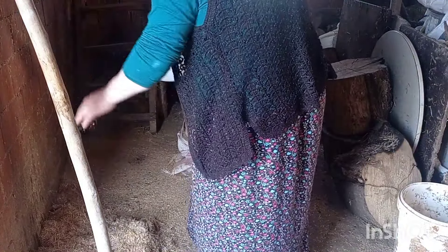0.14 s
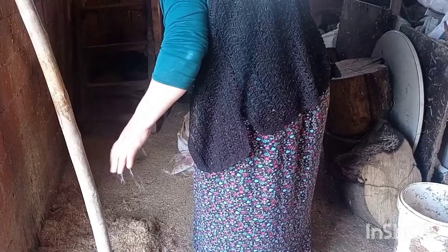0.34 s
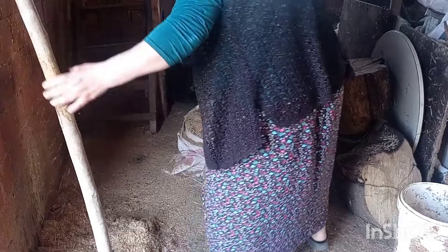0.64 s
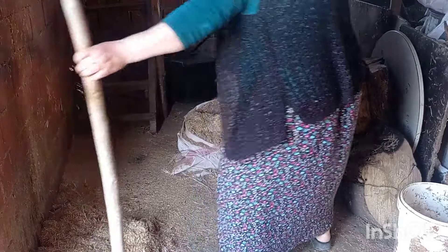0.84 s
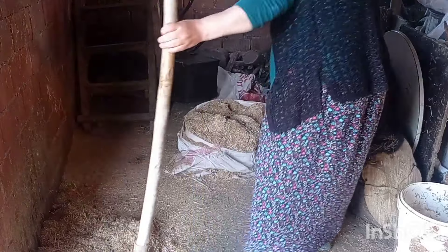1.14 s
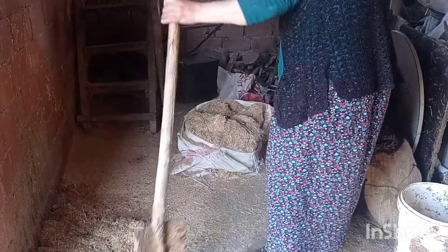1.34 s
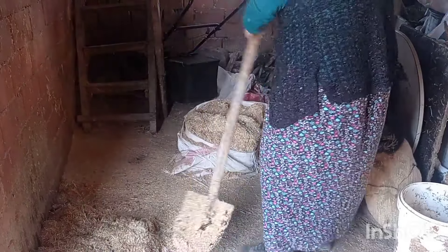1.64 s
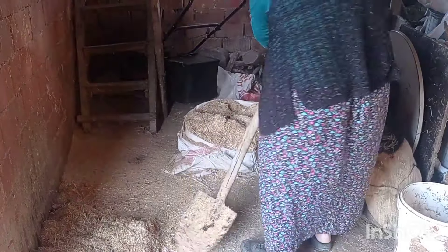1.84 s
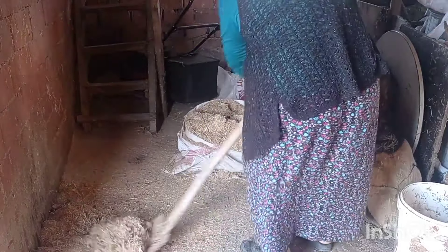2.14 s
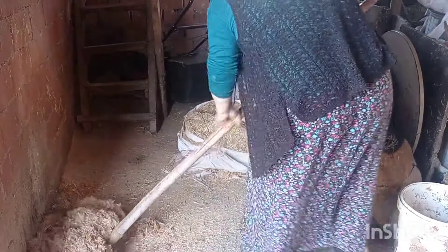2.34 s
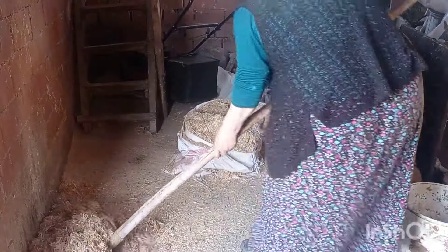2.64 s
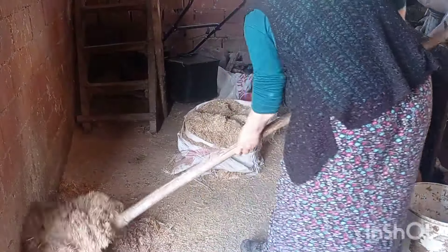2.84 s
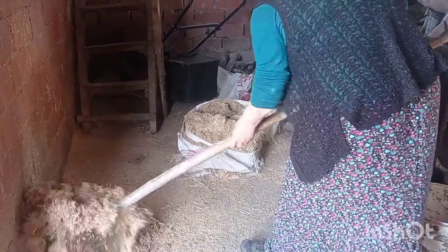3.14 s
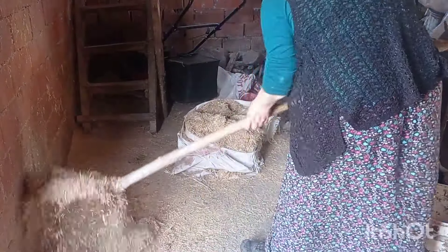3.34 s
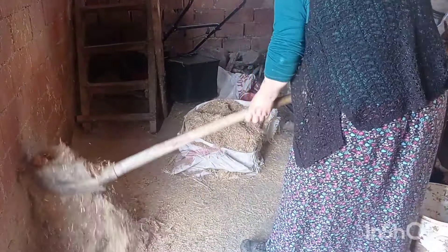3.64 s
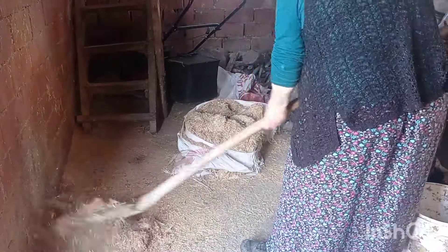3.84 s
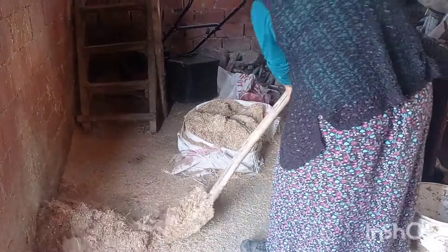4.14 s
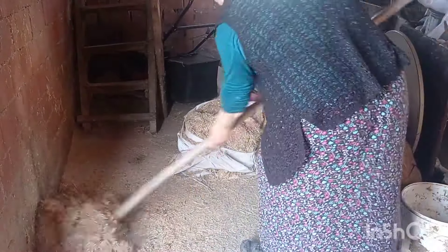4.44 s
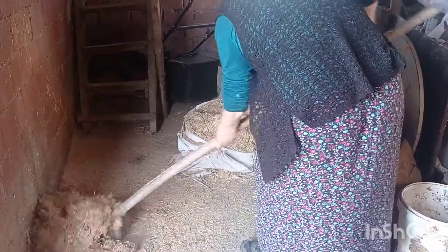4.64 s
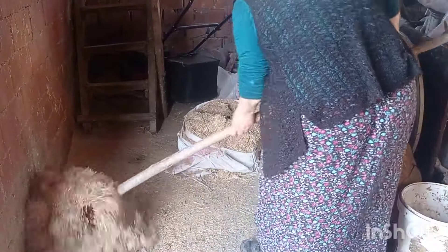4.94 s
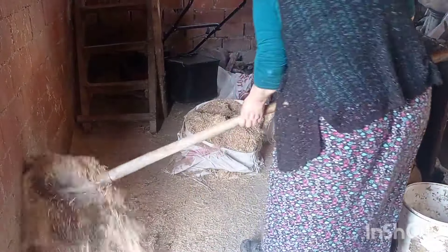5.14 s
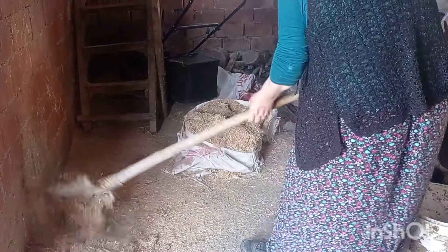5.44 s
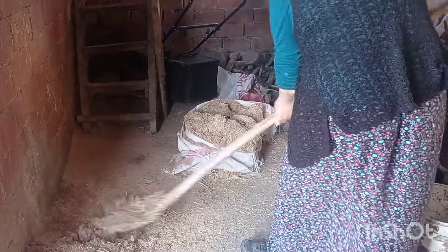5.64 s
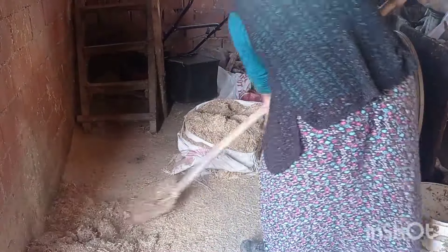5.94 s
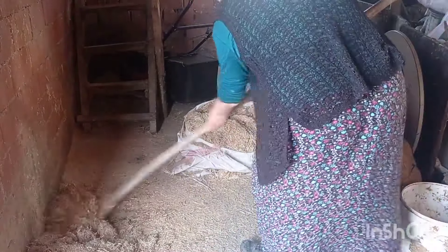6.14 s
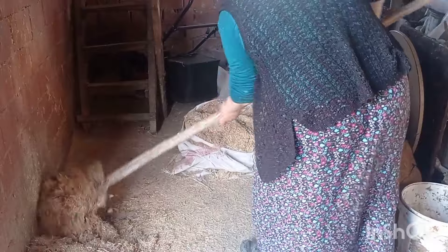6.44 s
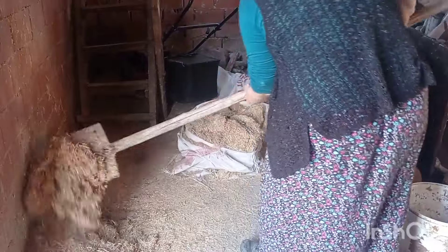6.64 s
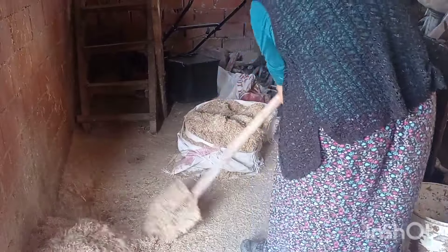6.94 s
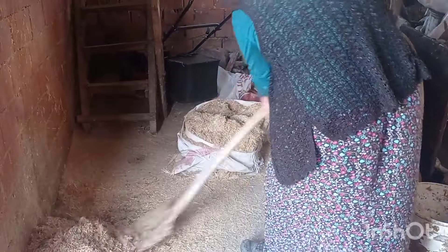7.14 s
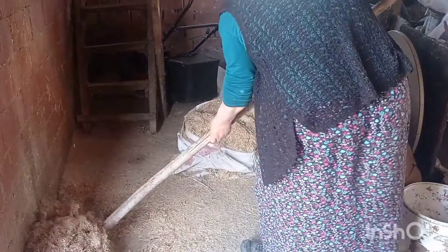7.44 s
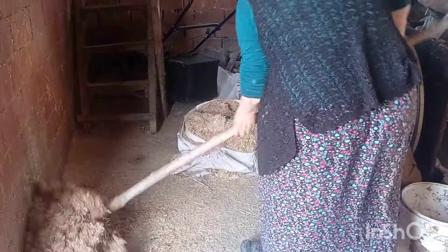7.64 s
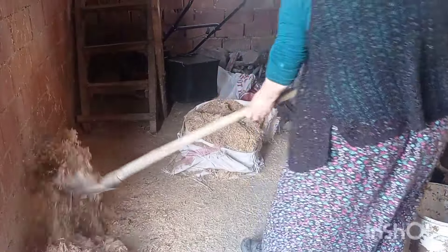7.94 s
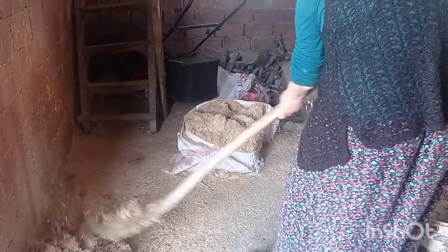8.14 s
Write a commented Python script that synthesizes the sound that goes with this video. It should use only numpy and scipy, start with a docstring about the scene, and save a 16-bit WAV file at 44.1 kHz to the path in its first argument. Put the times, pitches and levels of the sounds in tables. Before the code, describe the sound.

Quiet at first: a faint low rumble that dips, a soft straw hiss and tiny ticks. A shovel blade then bangs on gritty ground, ringing dully with a short barn echo. Four strokes follow, each a short, loud, crackling scrape with ringing steel and squeaks, separated by muffled thuds and rustling wet straw sliding off the blade. Straw settles at the end.

```python
"""A shovel turns a pile of wet, chopped straw on the gritty floor of a small barn, heard by one microphone.
Over a faint low rumble that dips early on, straw slides with a hiss, drops patter, and the shovel clinks.
The blade is set on the floor: each blow rings the steel, crushes grit and leaves a low boom in the barn.
From about two seconds, four strokes scrape under the pile, as crackling grit, ringing steel and squeaks.
Between strokes the loaded blade thuds as it is emptied, and straw goes on sliding to the end."""
import sys
import numpy as np
from scipy import signal
from scipy.io import wavfile
from scipy.ndimage import uniform_filter1d

SR = 44100
rng = np.random.default_rng(int(sys.argv[2]) if len(sys.argv) > 2 else 0)


def pcm_store(signal):
    """Save signal as 16-bit PCM."""
    levels = np.round(np.clip(np.atleast_2d(signal), -1, 1) * 32767)
    wavfile.write(sys.argv[1], SR, levels.astype(np.int16).T)


N = 365148
TIME = np.arange(N) / SR  # s


def amp(db):
    """Turns decibels into gain."""
    return 10 ** (np.asarray(db) / 20)


def evened(x):
    """Scales a sound to rms 1."""
    return x / np.sqrt(np.mean(x ** 2) + 1e-20)


def read(points, hz):
    """Reads a table on a log-frequency axis."""
    f, value = np.transpose(points)
    return np.interp(np.log(hz + 1), np.log(f + 1), value)


def add(mix, start_s, sound):
    """Mixes a sound in at its start time, cut off at the end of the mix."""
    part = mix[max(round(start_s * SR), 0):][:len(sound)]
    part += sound[:len(part)]


def convolved(x, response):
    """Passes a sound through an impulse response."""
    return signal.fftconvolve(x, response)[:len(x)]


def band(x, low_hz, high_hz, order):
    """Band-pass filters a sound."""
    sos = signal.butter(order, [low_hz, high_hz], "band", fs=SR, output="sos")
    return signal.sosfilt(sos, x)


def registers(x, edges_hz):
    """Splits a sound into bands at the given edges, each of rms 1."""
    pairs = zip([70] + edges_hz, edges_hz + [SR * .45])
    return [evened(band(x, low, high, order=4)) for low, high in pairs]


def coloured(x, spectrum, size=4096):
    """Gives a sound a spectrum with a causal, minimum-phase filter, then scales it to rms 1."""
    hz = abs(np.fft.fftfreq(size, 1 / SR))
    log_gain = np.log(amp(read(spectrum, hz)))
    # the Hilbert transform of the log gain supplies the phase
    response = np.fft.ifft(np.exp(np.conj(signal.hilbert(log_gain)))).real
    return evened(convolved(x, response[:size // 2]))


def envelope(start, length, attack_s, release_s):
    """Rises, holds until the length is over, then dies away."""
    age = TIME - start
    rise = np.clip(age / attack_s, 0, 1)
    return rise * np.exp(-np.maximum(age - length, 0) / release_s)


def grains(per_s, spread_db, clump_db):
    """Random clicks, most small and a few large, whose size swells and shrinks in clumps."""
    smooth = uniform_filter1d(uniform_filter1d(rng.standard_normal(N), size=300), size=300)
    clumps = np.clip(evened(smooth), -2, 2)
    size = amp(spread_db * np.minimum(rng.exponential(1, N), 4) + clump_db * clumps)
    sign = rng.choice([-1, 1], N)
    return evened(size * sign * (rng.random(N) < per_s / SR))


def wandering(x, depth_db):
    """The contact point shifts along the blade, so its resonances swell and fade at random."""
    z = signal.stft(x, nperseg=1024)[2]
    patches = uniform_filter1d(rng.standard_normal(z.shape), size=3, axis=0)
    patches = evened(uniform_filter1d(patches, size=4, axis=1))
    gain = amp(depth_db * np.clip(patches, -2, 2))
    return evened(signal.istft(z * gain, nperseg=1024)[1][:N])


def ring(modes, t):
    """Sums the modes of a struck body, each a sine dying by 60 dB in its own t60."""
    total = 0
    for hz, db, t60 in modes:
        total = total + amp(db - 60 * t / t60) * np.sin(2 * np.pi * hz * t) * rng.choice([-1, 1])
    return evened(total)


# the barn's echo: (frequency [Hz], t60 [s])
BARN_ECHO = [(100, 0.64), (260, 0.063), (700, 0.34), (1800, 0.28), (5000, .2), (12000, 0.15)]


def barn(wet_db):
    """Direct sound, a few slaps from near walls, and a dense tail whose bass lasts longest."""
    count = SR // 2
    sparse = rng.choice([-1., 1.], count) * (rng.random(count) < .08)
    hz, t, z = signal.stft(sparse, SR, nperseg=256)
    decay = amp(-60 * t / read(BARN_ECHO, hz)[:, None])
    tail = signal.istft(z * decay, SR, nperseg=256)[1][:count]
    tail *= np.minimum(TIME[:count] / 0.0021, 1)
    tail /= np.linalg.norm(tail)
    for delay_s in rng.uniform(.002, .022, size=8):
        # later slaps have travelled a longer distance; soft walls dull them
        slap = .18 * np.exp(-delay_s / .025) * np.hanning(7)
        add(tail, delay_s, slap * rng.choice([-1, 1]))
    response = amp(wet_db) * tail
    response[0] += 1
    return response / np.linalg.norm(response)


# background level, which dips early on and comes back: (time [s], level [dB])
BACKGROUND_LEVEL = [(0, -65), (.48, -68.5), (.62, -82), (1.08, -82), (1.25, -72), (3, -64.5), (5.8, -67.5),
                    (8.28, -63.5)]


def background():
    """Follows the gain of the background over time, with its early dip."""
    return amp(np.interp(TIME, *np.transpose(BACKGROUND_LEVEL)))


# spectrum of the faint background: (frequency [Hz], relative density [dB per Hz])
AIR_SPECTRUM = [(20, -18.5), (45, 2.5), (65, -3), (110, -9), (200, -20.5), (500, -20.5), (2000, -33),
                (6000, -26), (10000, -42.5), (16000, -59)]


def air():
    """A faint low rumble that dips early on, made of coloured noise at the background level."""
    return coloured(rng.standard_normal(N), AIR_SPECTRUM) * background()


# straw slides off the blade or down the pile:
# (crest time [s], length scale [s], hiss level [dB], rustle level [dB])
STRAW_SLIDES = [(0.01, 0.24, -54.5, -56), (0.49, .07, -83, -74), (1.271, 0.14, -58.5, -46.5),
                (1.806, 0.11, -58, -50.5), (2.036, 0.23, -57.5, -83), (2.217, 0.22, -53.5, -48),
                (2.489, 0.21, -56, -52.5), (2.909, 0.16, -59.5, -69), (3.093, .16, -53, -46),
                (3.383, 0.33, -54.5, -66.5), (3.745, 0.29, -57.5, -71), (3.902, 0.2, -53, -71),
                (4.29, 0.089, -62, -58.5), (4.8, 0.28, -61, -64), (5.06, 0.25, -55.5, -80),
                (5.258, 0.29, -56.5, -65), (5.532, 0.23, -51.5, -59), (5.73, 0.21, -64.5, -81),
                (6.51, 0.25, -58.5, -54), (6.68, 0.23, -64.5, -83), (6.958, 0.19, -54.5, -72),
                (7.625, 0.35, -61, -64.5), (7.968, 0.49, -60.5, -90), (8.21, 0.29, -52.5, -61.5)]
# spectrum of sliding chaff: (frequency [Hz], relative density [dB per Hz])
HISS_SPECTRUM = [(200, -49), (1000, -28.5), (2500, -12), (4000, -7), (5600, -1), (6800, -2), (8000, -10),
                 (10000, -13), (12000, -23), (14000, -27.5), (15300, -15.5)]
# spectrum of heavier wet clumps: (frequency [Hz], relative density [dB per Hz])
RUSTLE_SPECTRUM = [(30, -46.5), (100, -16.5), (400, -12), (800, -4), (1400, -4.5), (2500, -3), (4000, -7.5),
                   (8000, -35)]
TRICKLE_DB = -10.5  # loose chaff trickling between slides, re the background level
LEAN = .08  # share of its length by which a slide gathers longer and settles shorter


def straw():
    """Thousands of chaff pieces hiss as they slide; heavier wet clumps rustle lower."""
    sliding_power = (amp(TRICKLE_DB) * background()) ** 2
    tumbling_power = np.zeros(N)
    for crest, length, hiss_db, rustle_db in STRAW_SLIDES:
        age = TIME - crest
        # a lopsided bell
        width = length * (.5 - LEAN * np.sign(age))
        flow = np.exp(-(age / width) ** 2 / 2)
        sliding_power = sliding_power + (amp(hiss_db) * flow ** 2) ** 2
        tumbling_power = tumbling_power + (amp(rustle_db) * flow ** 2) ** 2
    chaff = grains(per_s=6000, spread_db=3, clump_db=.7)
    hiss = coloured(convolved(chaff, barn(wet_db=-10.0)), HISS_SPECTRUM)
    clumps = grains(per_s=520, spread_db=3.0, clump_db=7.5)
    rustle = coloured(convolved(clumps, barn(wet_db=1.5)), RUSTLE_SPECTRUM)
    return hiss * np.sqrt(sliding_power) + rustle * np.sqrt(tumbling_power)


# blows of the blade on floor and pile: (time [s], body level [dB], then re that level
# thud [dB], clang [dB], grit [dB]; pitch [Hz], lower the softer the blow)
BLADE_BLOWS = [(0.01, -62.5, -39, -5, -9, 470), (1.285, -24, -26.5, -15, -40, 520),
               (1.298, -21.5, -33.5, -35, -41, 680), (1.444, -31, -24, -20, -29.5, 550),
               (1.881, -65.5, -7, -11, -7, 630), (2.978, -23.5, -3, -17, -30.5, 560),
               (3.212, -26, -3, -9.5, -21, 560), (3.609, -50.5, 5.5, -5.5, -9.5, 140),
               (3.686, -73, 12, -22, -22, 88), (4.909, -28.5, -1, -14.5, -13, 480),
               (5.204, -68, 6, 2.5, -15.5, 1030), (6.533, -67, -29, 0.5, -7, 670)]
# edges between thud, body, clang and grit: (frequency [Hz])
BLOW_EDGES_HZ = [340, 1200, 3500]
# spectrum of a blow: (frequency [Hz], relative density [dB per Hz])
BLOW_SPECTRUM = [(40, -31), (100, -21.5), (170, -11), (300, -11.5), (450, -3), (650, -5.5), (1000, -14),
                 (1700, -20.5), (3000, -33), (4800, -33), (6900, -30), (8500, -41.5), (13000, -61.5),
                 (15500, -54)]
# modes of the shovel's blade and shaft, free of straw: (frequency [Hz], relative level [dB], t60 [s])
SHOVEL_MODES = [(160.6, -8.5, 0.3), (184.5, -13, 0.55), (232.7, -4, 0.2), (308.7, -0.5, .25),
                (405.3, -2, .19), (440.6, -2.5, 0.14), (493.1, -1.5, .18), (556.5, -4, .2), (622, 2, .17),
                (771, -6.5, 0.29), (910, -7, .2), (1003, -14, 0.1), (1119, -15, .22), (1270, -16.5, .17),
                (1367, -14.5, 0.17), (1437, -12, .2), (2058, -13.5, .17), (2440, -20, .14),
                (3007, -17, .11), (3413, -24, .15), (3840, -27.5, .12), (5570, -30, .1), (6700, -20, .1)]
# low boom lingering in the barn after a thud: (frequency [Hz], relative density [dB per Hz])
BOOM_SPECTRUM = [(50, -16), (130, -10), (183, 0), (215, -6), (253, 0), (320, -1), (400, -13), (580, -19),
                 (900, -32), (2000, -60)]
# the barn's own low notes, woken by a thud: (frequency [Hz], relative level [dB], t60 [s])
BARN_NOTES = [(155.6, -7, .8), (168.5, -2, 1.1), (236, -4.5, .8), (255.7, -3, 0.73), (291, 1, 0.59),
              (324, -5.5, 1.0)]
BOOM_DB, HUM_DB = -25.5, -20.5  # boom and barn notes, re the thud that starts them
# grit crushed by a blow: band [Hz], time to its peak [s], level re the blow's clang [dB]
CRUNCH_BAND_HZ = [1900, 3400]
CRUNCH_S, CRUNCH_DB = .014, 4.5


def knocks():
    """A dull blow crushes grit, rings the shovel and fills the barn; a faint low boom lingers."""
    out, t = np.zeros(N), TIME[:SR // 2]
    crushed = band(grains(per_s=2700, spread_db=4.0, clump_db=3.0), *CRUNCH_BAND_HZ, order=2)
    crunch = wandering(crushed, depth_db=5)
    for s, db, thud_db, clang_db, grit_db, hz in BLADE_BLOWS:
        blow = coloured(barn(wet_db=6.5), BLOW_SPECTRUM) + amp(0.5) * ring(SHOVEL_MODES, t)
        # the time in contact decides which modes take up the most energy
        blow = blow + amp(6.5) * band(blow, hz * 0.62, hz * 1.2, order=1)
        thud, body, clang, grit = registers(blow, BLOW_EDGES_HZ)
        crush = t / CRUNCH_S * np.exp(1 - t / CRUNCH_S)
        clang = clang + amp(CRUNCH_DB) * crush * crunch[round(s * SR):][:len(t)]
        sound = body + amp(thud_db) * thud + amp(clang_db) * clang + amp(grit_db) * grit
        add(out, s, amp(db) * sound * np.minimum(t / 0.0016, 1))
        boom = coloured(rng.standard_normal(SR), BOOM_SPECTRUM)
        boom = evened(boom * amp(-60 * TIME[:SR] / 1.2))  # t60 1.2 s
        hum = ring(BARN_NOTES, TIME[:SR])
        add(out, s, amp(db + thud_db) * (amp(BOOM_DB) * boom + amp(HUM_DB) * hum))
    return out


# drops, snapping stalks, and last two clacks of the shovel just after a thud:
# (time [s], level [dB], pitch [Hz])
TICKS_AND_CLACKS = [(0.074, -63.5, 4950), (0.192, -64, 6150), (.271, -77, 5960), (0.3013, -68, 3830),
                    (0.354, -72, 5800), (0.459, -60.5, 6500), (0.754, -74, 6500), (1.4037, -67, 2050),
                    (1.566, -71, 2440), (2.477, -58, 6440), (2.6577, -57.5, 5830), (3.0036, -44, 2920),
                    (3.064, -47.5, 2160)]
# spectrum of a tick or clack: (frequency [Hz], relative density [dB per Hz])
SNAP_SPECTRUM = [(60, -46), (200, -17.5), (1500, -12), (3500, -8.5), (6300, -1), (8200, -10.5),
                 (11000, -18), (15000, -38.5)]
# a light clink as the shovel is taken up: (time [s], level [dB])
SHOVEL_CLINKS = [(0.7904, -66), (0.7984, -52.5)]
# modes of the clinking shovel: (frequency [Hz], relative level [dB], t60 [s])
CLINKING_MODES = [(2240, -11, .1), (2323, -2, .06), (2961, -3, .09), (4165, -12, .08), (5312, -5, .08),
                  (6667, -9, .07), (9240, -21, .11)]


def small_sounds():
    """Drops, stalks and two shovel clacks snap with a tiny ping; the shovel's high modes clink."""
    out, t = np.zeros(N), TIME[:SR // 2]
    for s, db, hz in TICKS_AND_CLACKS:
        ping = amp(-9) * ring([(hz, 0, .04)], t)
        tick = coloured(barn(wet_db=-9), SNAP_SPECTRUM) + ping
        add(out, s, amp(db) * tick * np.minimum(t / 0.000882, 1))
    for s, db in SHOVEL_CLINKS:
        clink = ring(CLINKING_MODES, t)
        clink = clink + amp(-3.0) * coloured(barn(wet_db=-8.5), SNAP_SPECTRUM)
        add(out, s, amp(db) * clink * np.minimum(t / 0.00023, 1))
    return out


# short squeaks of the steel edge, and one faint high ping early on:
# (time [s], length [s], middle pitch [Hz], level [dB])
SQUEAKS_AND_PING = [(2.392, 0.052, 748, -33), (4.422, 0.052, 767, -18), (6.068, 0.025, 720, -32.5),
                    (6.174, 0.016, 796, -25), (6.193, 0.03, 1216, -23.5), (7.214, 0.026, 761, -16),
                    (7.271, 0.058, 661.6, -25.5), (7.309, 0.057, 656, -25.5), (7.388, .035, 722, -24),
                    (7.424, 0.017, 710, -27.5), (2.663, 0.079, 1321, -71.5), (2.743, .06, 923.7, -68.5),
                    (0.306, 0.081, 3930, -72)]
SQUEAK_RISE = .035  # rise over each tone, as when the blade is pressed home, share of the pitch


def squeaks():
    """Stick and slip of the edge, and one early ping: brief, unsteady tones with weak overtones."""
    out = np.zeros(N)
    for s, length, hz, db in SQUEAKS_AND_PING:
        count = max(int(length * SR), 200)
        jitter = evened(uniform_filter1d(rng.standard_normal(SR), size=60))[:count]
        rise = 1 + SQUEAK_RISE * np.linspace(-.5, .5, count)
        pitch = hz * rise * (1 + 0.012 * jitter)
        phase = 2 * np.pi * np.cumsum(pitch) / SR
        tone = np.sin(phase) + amp(-19.5) * np.sin(2 * phase) + amp(-18.5) * np.sin(3 * phase)
        add(out, s, amp(db) * evened(tone * np.hanning(count)))
    return convolved(out, barn(wet_db=-20.5))


# spectrum of crushed grit: (frequency [Hz], relative density [dB per Hz])
GRIT_SPECTRUM = [(35, -75), (60, -60.5), (164, -27), (207, -45), (300, -3.5), (380, -11), (747, -0.5),
                 (820, 1), (1160, -1.5), (2760, -17), (3030, -14.5), (4010, -19), (6550, -18),
                 (8080, -31.5), (15900, -55)]


def friction(per_s, spread_db, clump_db, ring_db):
    """Grit crushed under the blade crackles and sets the steel ringing, damped by the straw."""
    clicks = grains(per_s, spread_db, clump_db)
    damped = []
    for hz, db, t60 in SHOVEL_MODES:
        # modes below 1100 Hz lose 7 dB an octave; all die sooner
        damped.append((hz, db + 7 * np.log2(min(hz, 1100) / 1100), t60 * 0.7))
    ringing = wandering(convolved(clicks, ring(damped, TIME[:SR // 2])), depth_db=4.5)
    crackle = wandering(coloured(clicks, GRIT_SPECTRUM), depth_db=3.0)
    return band(crackle + amp(ring_db) * ringing, 100, SR * .45, order=2)


# four strokes under the pile, each a few shoves of the blade: (start time [s], length [s],
# middle level [dB], bass re that level [dB], treble re that level [dB])
BLADE_SHOVES = [(2.159, 0.2, -45, -5.5, -14.5), (2.246, 0.11, -24.5, 1, -7.5), (2.368, 0.093, -45.5, 6, -9),
                (4.297, 0.075, -42.5, -10.5, -2), (4.355, 0.019, -41, -14, 7),
                (4.383, 0.094, -16.5, -10, -10), (4.48, 0.066, -23.5, -1, -11.5),
                (5.919, 0.014, -50, -44.5, -3.5), (5.992, 0.031, -30, -39, -5),
                (6.007, .07, -26, -20, -8.5), (6.121, 0.022, -14.5, -16, -15),
                (6.174, 0.051, -34.5, -0.5, -16), (6.226, 0.013, -18, -19, -19.5),
                (7.058, 0.22, -51, 1, -2.5), (7.182, 0.041, -28, -8.5, -2), (7.193, 0.063, -24, -14, -10.5),
                (7.259, 0.025, -17.5, -9, -12.5), (7.31, 0.088, -21.5, -6.5, -9)]
# the blade catches on the floor and jumps free: (time [s], level [dB])
BLADE_CATCHES = [(2.258, -30.5), (2.317, -17), (4.307, -42), (4.364, -32.5), (4.463, -8.5), (6.018, -18.5),
                 (6.138, -23), (6.195, -22.5), (6.24, -21), (7.09, -47), (7.183, -29), (7.218, -21),
                 (7.323, -29.5), (7.367, -19)]
# edges between a scrape's bass, middle and treble: (frequency [Hz])
SCRAPE_EDGES_HZ = [450, 2200]
# a shove bites quickly, holds, and runs out; the fine treble crackle dies away more slowly
BITE_S, RUN_OUT_S, CRACKLE_OUT_S = 0.016, 0.015, 0.023
CATCH_S = .019  # time for a catch to fall to 1/e
# the weight of the pile rumbles under a shove: band [Hz], level re the shove's bass [dB]
HEAVE_BAND_HZ = [80.8, 203]
HEAVE_DB = -20


def scrapes():
    """Each shove scrapes steadily, with sudden surges where the edge catches."""
    grit = friction(per_s=1800, spread_db=2.5, clump_db=5.0, ring_db=-10.5)
    bass, middle, treble = registers(grit, SCRAPE_EDGES_HZ)
    heave = evened(band(rng.standard_normal(N), *HEAVE_BAND_HZ, order=2))
    bass = bass + amp(HEAVE_DB) * heave
    gains = np.zeros((3, N))
    for s, length, db, bass_db, treble_db in BLADE_SHOVES:
        pressure = envelope(s, length, BITE_S, RUN_OUT_S)
        crackle = envelope(s, length, BITE_S, CRACKLE_OUT_S)
        shove = np.array([amp(bass_db) * pressure, pressure, amp(treble_db) * crackle])
        # where shoves overlap, the stronger one carries on
        gains = np.maximum(gains, amp(db) * shove)
    steady = np.sum(gains * [bass, middle, treble], axis=0)
    surge = np.zeros(N)
    for s, db in BLADE_CATCHES:
        add(surge, s, amp(db) * np.exp(-(TIME[:SR // 4] / CATCH_S) ** 2))
    catches = surge * evened(friction(per_s=1200, spread_db=6.0, clump_db=1.0, ring_db=-31.5))
    return convolved(steady, barn(wet_db=-5.5)) + convolved(catches, barn(wet_db=-7.0))


def scene():
    """Sums everything at one microphone."""
    return (scrapes() + squeaks() + knocks() + small_sounds() + straw() + air())[None]


CUT_HZ = 16000  # upper band limit


def record(dry):
    """The microphone sheds deep bass, the hardest peaks overload; then the band limit."""
    thinned = signal.sosfilt(signal.butter(3, 48, "high", fs=SR, output="sos"), dry)
    clipped = np.clip(thinned, -1, 1)
    low_pass = signal.firwin(511, CUT_HZ, window=("kaiser", 9), fs=SR)
    return signal.oaconvolve(clipped, low_pass[None], "same")


dry = scene()
out = record(dry)
pcm_store(out)
```